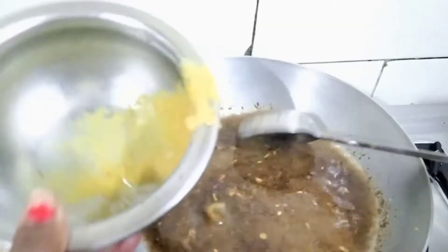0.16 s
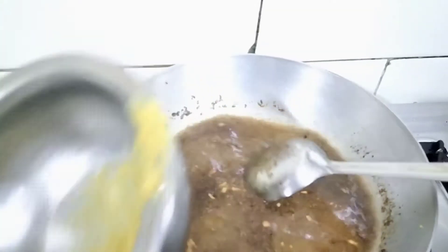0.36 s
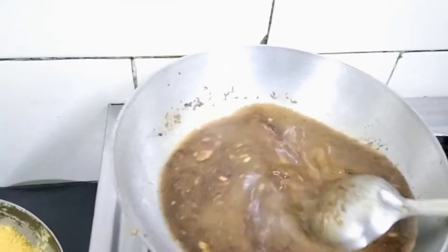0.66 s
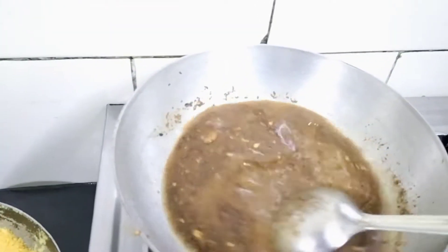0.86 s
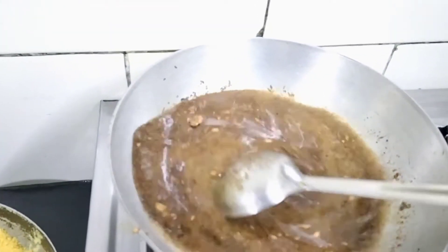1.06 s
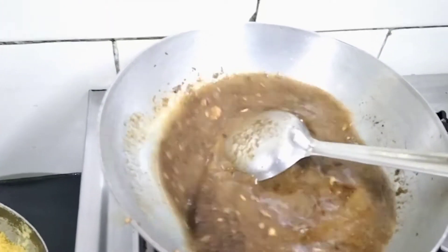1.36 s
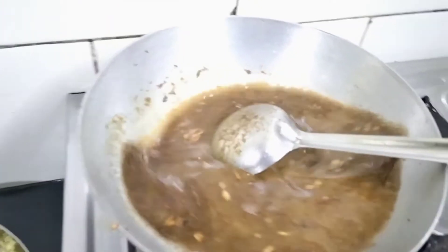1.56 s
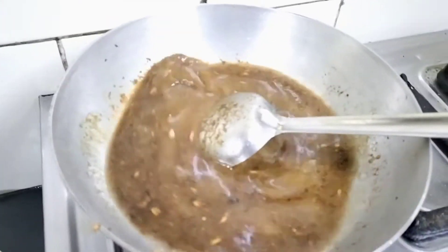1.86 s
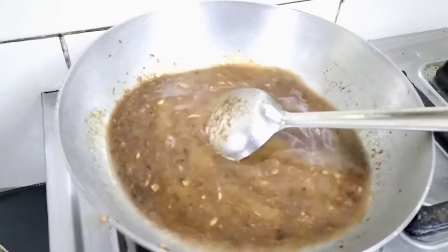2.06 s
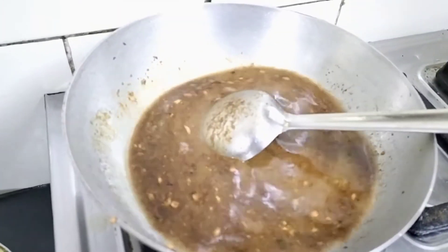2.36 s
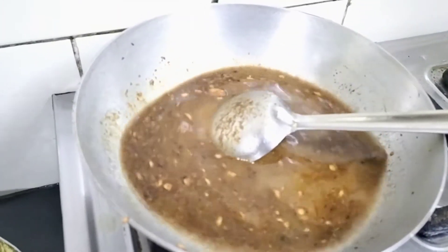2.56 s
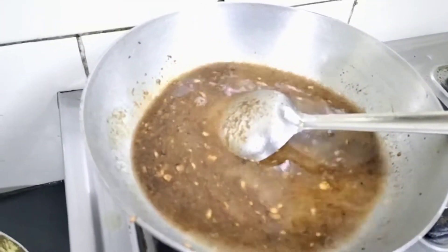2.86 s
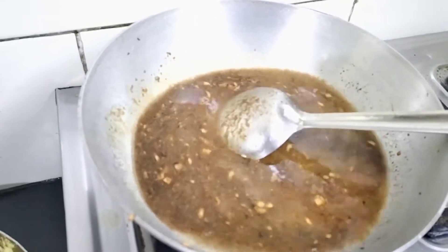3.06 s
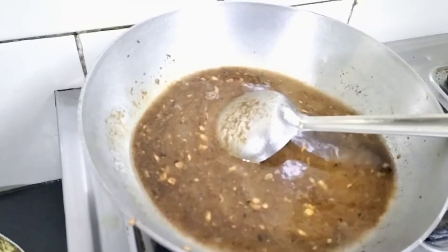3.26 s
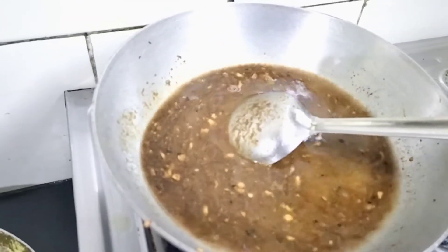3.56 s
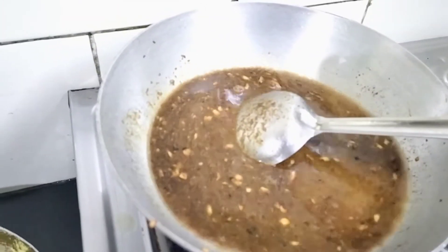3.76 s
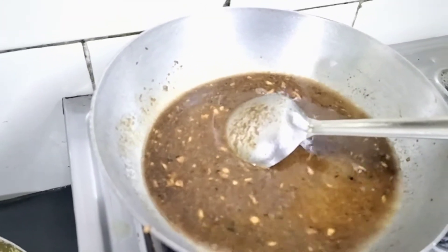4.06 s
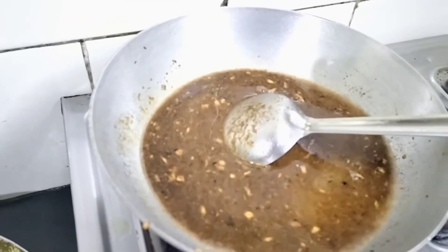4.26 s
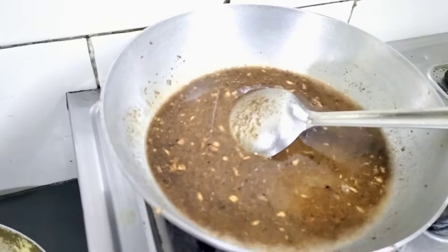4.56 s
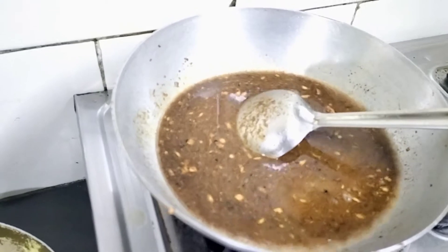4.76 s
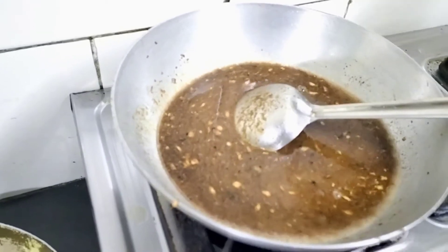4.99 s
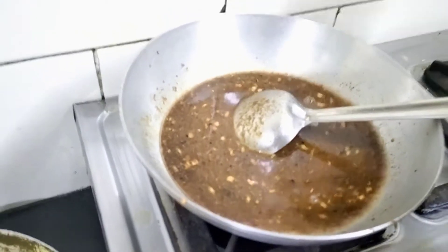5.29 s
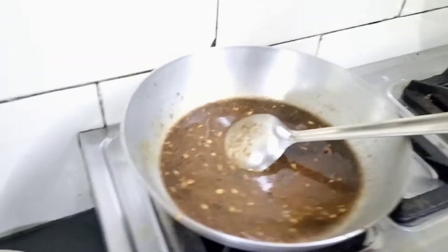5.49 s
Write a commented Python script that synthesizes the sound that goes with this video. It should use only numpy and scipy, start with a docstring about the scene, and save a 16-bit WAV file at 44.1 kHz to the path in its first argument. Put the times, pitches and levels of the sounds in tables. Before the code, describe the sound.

Watery batter sizzles in a wide pan of hot oil, heard up close in a small tiled kitchen. The bright hiss is there from the start and swells within the first half second, thickening into a bubbling, churning boil, with a soft bump at about 1 second. From around 2 seconds the sizzle steadily dies away, flaring briefly whenever the liquid sloshes, and single spitting droplets begin to stand out.

At about 3 seconds a steel bowl is put down beside the stove with a short rattle and ring, followed by a sharp, dry tap near 3.3 seconds. Around 4.3 seconds a faint sliding squeak leads into a bright utensil clink. Just after 5 seconds a lid clatters lightly, with dull worktop bumps and a faint low rumble, while the pan settles to a quiet simmer.

```python
"""Hot spiced oil sizzles in a wide pan as watery batter boils off in it, in a small tiled kitchen.
Tiny steam bursts fizz and spray, larger bubbles boil and churn, and stray droplets spit.
The sizzle swells, thickens to a boil and dies away as the pan cools, flaring as the batter sloshes.
Beside the stove a steel bowl is put down, a utensil clinks and a lid clatters, each rattling, then
ringing. Behind them sit worktop bumps, a faint sliding squeak and a low rumble."""
import sys
import numpy as np
from scipy import signal
from scipy.fft import rfft, irfft, next_fast_len
from scipy.io import wavfile

SR = 44100
rng = np.random.default_rng(int(sys.argv[2]) if len(sys.argv) > 2 else 0)


def unload_audio(sound):
    """Save the sound as a 16-bit wav file, at the path given as the first command line argument."""
    columns = np.transpose(np.atleast_2d(sound))
    # keep every value between -1 and 1, then stretch to whole-number steps
    steps = np.round(np.clip(columns, -1, 1) * 32767)
    wavfile.write(sys.argv[1], SR, steps.astype(np.int16))


N = 248326
TIME = np.arange(N) / SR

# Tone of each sizzle layer, from the top hiss down: freq_hz, level_db
AIR_EQ = [(8800, -50), (9500, -35), (10300, -7.5), (11300, -7), (11900, 4.5), (12600, -4.5), (15800, -3.5)]
SPRAY_EQ = [(3900, -5), (4500, -5), (5300, -3), (5850, 1.5), (6500, -1), (7200, -0.5), (8360, -7.5),
            (9400, -21)]
FIZZ_EQ = [(1300, -25.5), (1950, -16), (2200, -6.5), (2560, 0.5), (2780, 0), (3150, -3.5), (3850, -1),
           (4100, -8.5), (4380, -23.5), (5200, -28)]
BOIL_EQ = [(450, -12.5), (600, -13), (790, -1.5), (880, -13), (1040, -22), (1150, -6), (1480, 2.7),
           (1900, 0), (2300, 0)]
HOLLOW_EQ = [(760, -8.5), (860, 0), (970, 10), (1060, 2), (1170, -1)]
CHURN_EQ = [(20, -24), (60, -22), (130, -7), (220, -3.5), (350, 2.5), (600, 4.5), (850, -32)]
def sizzle(gain):
    """Tiny steam bursts hiss, larger bubbles boil in the hollow of the pan, the largest churn below."""
    tiny = bursts(per_s=12000, spread_db=2.5)
    tiny += gain_of(-13.5) * bubbles(count=4000, low_hz=2010, high_hz=8957, ring_s=0.014)
    larger = bursts(per_s=4500, spread_db=1.5)
    larger += gain_of(-17.5) * bubbles(count=900, low_hz=599, high_hz=2203, ring_s=0.026)
    tiny, larger = kitchen(tiny, wet_db=-8.5), kitchen(larger, wet_db=-4.5)
    largest = kitchen(bursts(per_s=560, spread_db=2.5), wet_db=1)
    layers = [("fizz", tiny, FIZZ_EQ), ("spray", tiny, SPRAY_EQ), ("air", tiny, AIR_EQ),
              ("boil", larger, BOIL_EQ), ("hollow", larger, HOLLOW_EQ), ("churn", largest, CHURN_EQ)]
    return sum(gain[layer] * coloured(crackle, eq) for layer, crackle, eq in layers)


def bursts(per_s, spread_db):
    """Bubbles burst as random clicks: many small, a few large."""
    size = gain_of(spread_db * np.minimum(rng.exponential(1, N), 5))
    polarity = rng.choice([-1., 1.], N)
    bursting = rng.random(N) < per_s / SR
    return unit_rms(polarity * size * bursting)


def bubbles(count, low_hz, high_hz, ring_s):
    """Bubbles ring for an instant as they surface, each at its own, slightly rising pitch."""
    when, pitch, size, life = rng.random((count, 4)).T[:, :, None]
    t = np.arange(SR // 40) / SR
    hz = low_hz + (high_hz - low_hz) * pitch
    envelope = size ** 2 * np.exp(-t / (ring_s * (.5 + life))) * (1 - t / t[-1])
    pings = envelope * np.sin(2 * np.pi * hz * t * (1 + t))
    positions = (when * N).astype(int) + np.arange(len(t))
    return unit_rms(np.bincount(positions.ravel(), pings.ravel(), N)[:N])


# Arc of each sizzle layer: full_db, start_below_db, build_s, cooling_start_s, fall_db_per_s, simmer_db
SIZZLE_ARCS = {"fizz": (-20.3, 7.8, 0.26, 2.27, 13.9, -48.3), "spray": (-23.8, 5, 0.06, 2.2, 12.5, -52),
               "air": (-37.1, 5, 0.55, 2.2, 14.3, -69.5), "boil": (-27, 25, 0.35, 1.55, 9.8, -59),
               "hollow": (-36.6, 14, 0.12, 1.88, 34, -61), "churn": (-44, 19, 0.44, 1.4, 7.8, -64)}
def sizzle_gains(knee_s=0.2):
    """Each layer builds as the batter spreads and sinks to a simmer as the pan cools; flares ride on top."""
    flare, gain = flares(), {}
    for layer, (full_db, below_db, build_s, cooling_s, db_per_s, simmer_db) in SIZZLE_ARCS.items():
        cooled_s = knee_s * np.logaddexp(0, (TIME - cooling_s) / knee_s)  # cooling eases in
        level_db = full_db - below_db * np.exp(-TIME / build_s) - db_per_s * cooled_s
        arc = np.hypot(gain_of(level_db), gain_of(simmer_db))
        gain[layer] = np.hypot(arc, flare.get(layer, 0))
    return gain


# Sloshes of batter: start_s, end_s, fizz_db, spray_db, release_s
SLOSHES = [(0.28, 0.6, -21.3, -22.8, 0.09), (0.73, 0.95, -31, -23.3, 0.03), (1.15, 1.22, -30, -29, 0.06),
           (2.46, 2.54, -31.5, -31, 0.07), (2.87, 2.95, -30.5, -37.5, 0.06), (3.19, 3.35, -30.5, -40, 0.2),
           (3.745, 3.87, -29.5, -30.6, 0.045), (4.14, 4.23, -40.5, -44, 0.1),
           (4.46, 4.69, -39.3, -41.7, 0.15), (4.97, 5.03, -44.3, -45.5, 0.06)]
def flares(attack_s=0.09):
    """Batter hits hot bare metal: extra gain swells, holds while the metal is wet, and drops."""
    power = np.zeros((2, N))
    for start_s, end_s, fizz_db, spray_db, release_s in SLOSHES:
        swell = np.exp(-np.maximum(start_s - TIME, 0) / attack_s)
        release = np.exp(-np.maximum(TIME - end_s, 0) / release_s)
        power += (gain_of([[fizz_db], [spray_db]]) * swell * release) ** 2
    fizz, spray = np.sqrt(power)
    return {"fizz": fizz, "spray": spray, "air": gain_of(-18.5) * spray,
            "boil": gain_of(-14.5) * fizz, "hollow": gain_of(-21.5) * fizz}


def spits(fizz_gain):
    """Single droplets snap; they fade more slowly than the fizz, so they stand out as the pan cools."""
    drops = bursts(per_s=45, spread_db=3.5)
    snaps = coloured(drops, FIZZ_EQ) + 0.55 * coloured(drops, SPRAY_EQ)
    return kitchen(snaps * gain_of(-26) * fizz_gain ** 0.71, wet_db=6)


# Tone of each object's contact clack: freq_hz, level_db
BOWL_EQ = [(130, -35), (300, -19), (620, -18), (800, 0.5), (970, -8), (1300, -5), (2450, -7), (3300, -6),
           (9000, -25)]
UTENSIL_EQ = [(1300, -10), (1830, -4), (2300, -20), (2700, 2), (3600, -5), (4200, -3), (5200, -10),
              (7500, -6), (11000, -39)]
LID_EQ = [(120, -18), (220, -5.5), (520, 2), (660, -11), (960, 1), (1350, -9.5), (2540, -3), (3900, -0.5),
          (4700, -10), (7500, -12), (9600, -33), (15500, -29)]
# Ringing modes: pitch_hz, level_db, t60_s
BOWL_MODES = [(444, -22.5, 0.9), (814, -14, 0.062), (973, 8.5, 0.067), (1169, -7, 0.15), (1620, -7.5, 0.54),
              (1782, -18, .3), (2130, -21, .26), (2390, 2.5, 0.21), (3190, -8, 0.13), (4550, -12, .12)]
UTENSIL_MODES = [(1638, -11, 0.14), (1880, -9.5, 0.13), (2190, -15, 0.22), (2740, -16, 0.18),
                 (3548, 1, 0.12), (3840, -3, 0.079), (4030, 0, 0.058), (4700, -8, 0.1), (7300, -9, 0.11),
                 (9550, -23, .09)]
LID_MODES = [(438, -16, 0.33), (521, -11, 0.25), (635, -11, 0.23), (1193, -9, 0.23), (1736, 5.5, 0.088),
             (2233, 3, 0.16), (2618, 0, 0.18), (3600, -20.5, .2), (3994, -15, .22)]
# Hits: start_s, clack_db, ring_db, rattle_s, tilt_db_per_octave
BOWL_HITS = [(3.043, -21.5, -27, 0.0066, -5), (3.054, -22.3, -15.7, 0.017, 0.4),
             (3.352, -29.5, -44, 0.02, -0.5)]
UTENSIL_HITS = [(4.335, -29.5, -22.5, .01, 1), (4.349, -30, -20.5, .012, -0.88)]
LID_HITS = [(5.095, -30, -42, .025, -0.8), (5.123, -28.5, -39, 0.012, -1.2), (5.206, -30, -31.5, 0.015, 2),
            (5.213, -33.5, -29, 0.032, -1.8)]
def kitchenware():
    """A bowl lands, a utensil clinks and a lid clatters, each in a quick cluster of hits."""
    return (steel_hits(BOWL_HITS, BOWL_MODES, BOWL_EQ, ring_attack_s=0.004)
            + steel_hits(UTENSIL_HITS, UTENSIL_MODES, UTENSIL_EQ, ring_attack_s=0.0033)
            + steel_hits(LID_HITS, LID_MODES, LID_EQ, ring_attack_s=0.0024))


def steel_hits(hits, modes, clack_eq, ring_attack_s, clack_release_s=0.018):
    """Steel rattles briefly as it lands, then rings in its modes."""
    out, t = np.zeros(N), np.arange(SR * 3 // 4) / SR
    attack = 1 - np.exp(-t / ring_attack_s)
    for start_s, clack_db, ring_db, rattle_s, tilt_db in hits:
        contact = np.exp(-np.maximum(t - rattle_s, 0) / clack_release_s)
        clack = coloured(rng.standard_normal(len(t)), clack_eq, tilt_db) * contact
        ring = sum(gain_of(db - 60 * t / t60) * np.sin(2 * np.pi * (hz * t + rng.random()))
                   for hz, db, t60 in modes)
        add(out, start_s, gain_of(clack_db) * clack + gain_of(ring_db) * ring * attack)
    return out


# Dull bumps and dry taps around the stove: start_s, level_db, pitch_hz, t60_s
WORKTOP_HITS = [(1.025, -38, 215, 0.2), (3.063, -35.5, 294, 0.34), (3.235, -40.5, 310, 0.4),
                (3.338, -17, 1300, 0.03), (3.352, -31.5, 1500, 0.27), (3.359, -41.5, 310, 0.64),
                (4.139, -50.5, 300, 0.52), (4.176, -37, 1500, 0.3), (4.344, -42.5, 275, 0.26),
                (5.095, -37, 470, 0.16), (5.126, -34, 503, 0.21), (5.215, -41, 215, 0.26),
                (5.282, -41.5, 447, 0.15)]
def worktop_bumps(attack_s=0.0015):
    """The worktop answers each touch with a short noise burst around one pitch."""
    out, t = np.zeros(N), np.arange(SR // 2) / SR
    attack = 1 - np.exp(-t / attack_s)
    for start_s, level_db, hz, t60_s in WORKTOP_HITS:
        eq = [(.4 * hz, -24), (.75 * hz, -4), (hz, 0), (1.35 * hz, -7)]
        body = coloured(rng.standard_normal(len(t)), eq)
        add(out, start_s, gain_of(level_db - 60 * t / t60_s) * body * attack)
    return out


# Glide of the squeak: time_s, pitch_hz, level_db
SQUEAK_GLIDE = [(4.265, 977, -64), (4.28, 940, -46), (4.32, 877, -42.5), (4.36, 890, -62)]
def squeak():
    """Something slides with a short, fuzzy tone that sinks a little."""
    pitch_hz, level_db = automation(SQUEAK_GLIDE)
    gate = (TIME > SQUEAK_GLIDE[0][0]) & (TIME < SQUEAK_GLIDE[-1][0])
    waver = coloured(rng.standard_normal(N), [(20, 4), (120, -8)])
    phase = 2 * np.pi * np.cumsum(pitch_hz * (1 + 0.037 * waver)) / SR
    return np.sin(phase) * gain_of(level_db) * gate


# Fader ride of the rumble: time_s, level_db
RUMBLE_RIDE = [(0, -75), (4.85, -74), (4.94, -61), (5.1, -60), (5.25, -66), (5.4, -73)]
def rumble():
    """A faint low bed that swells while things are shifted."""
    eq = [(25, -34), (60, -8), (90, 3.5), (125, -2), (220, -7)]
    return coloured(rng.standard_normal(N), eq) * gain_of(automation(RUMBLE_RIDE)[0])


# Reverb time of the tiled room: freq_hz, t60_s
KITCHEN_DECAY = [(200, 0.46), (1000, 0.24), (4000, 0.28), (12000, 0.2)]
def kitchen(x, wet_db, predelay_s=0.003):
    """Adds dense reflections from the tiles, each band dying at its own speed."""
    t = np.arange(SR // 2) / SR
    echoes = rng.standard_normal(len(t)) * (rng.random(len(t)) < .1) * (t > predelay_s)
    hz, age_s, bands = signal.stft(echoes, SR, nperseg=256)
    t60_s = np.interp(hz, *np.transpose(KITCHEN_DECAY))
    tail = signal.istft(bands * gain_of(-60 * age_s / t60_s[:, None]), SR, nperseg=256)[1]
    wet = signal.fftconvolve(x, tail / np.linalg.norm(tail))[:N]
    return (x + gain_of(wet_db) * wet) / np.hypot(1, gain_of(wet_db))


def coloured(x, eq, tilt_db=0):
    """Shapes x with an EQ curve, tilted by tilt_db per octave about 2 kHz, at an rms of one."""
    size = next_fast_len(len(x))
    hz = np.fft.rfftfreq(size, 1 / SR) + 1  # keeps the logarithm finite
    eq_hz, eq_db = np.transpose(eq)
    octaves_outside = abs(np.log2(hz / np.clip(hz, eq_hz[0], eq_hz[-1])))
    curve_db = np.interp(np.log(hz), np.log(eq_hz), eq_db) - 40 * octaves_outside
    gain = gain_of(curve_db + tilt_db * np.log2(hz / 2000))
    return unit_rms(irfft(rfft(x, size) * gain, size)[:len(x)])


def gain_of(db):
    """Decibels to amplitude."""
    return 10 ** (np.asarray(db) / 20)


def unit_rms(x):
    """Scales to an rms of one."""
    return x / np.sqrt(np.mean(x ** 2) + 1e-20)


def automation(rows):
    """Joins breakpoints with straight lines in time, one curve per value column."""
    time_s, *columns = np.transpose(rows)
    return [np.interp(TIME, time_s, column) for column in columns]


def add(mix, start_s, sound):
    """Drops a sound into the mix at its cue."""
    part = mix[round(start_s * SR):][:len(sound)]
    part += sound[:len(part)]


def scene():
    """The pan up front, the kitchenware and rumble behind it, the same in both ears."""
    low_cut = signal.butter(3, 140, "high", fs=SR, output="sos")  # the clatter carries no deep bass
    clatter = signal.sosfilt(low_cut, kitchenware() + worktop_bumps())
    gain = sizzle_gains()
    pan = sizzle(gain) + spits(gain["fizz"])
    mono = pan + kitchen(clatter + squeak(), wet_db=-7.5) + rumble()
    return np.array([mono, mono])


def record(dry):
    """A steep high cut takes off the very top of the hiss."""
    cutoff_hz = 15850
    high_cut = signal.firwin(511, cutoff_hz, window=("kaiser", 9), fs=SR)
    return signal.oaconvolve(dry, high_cut[None], "same")


dry = scene()
out = record(dry)
unload_audio(out)
```